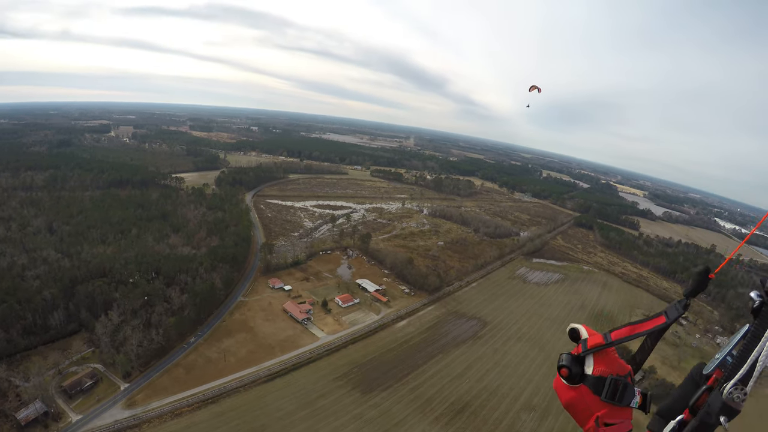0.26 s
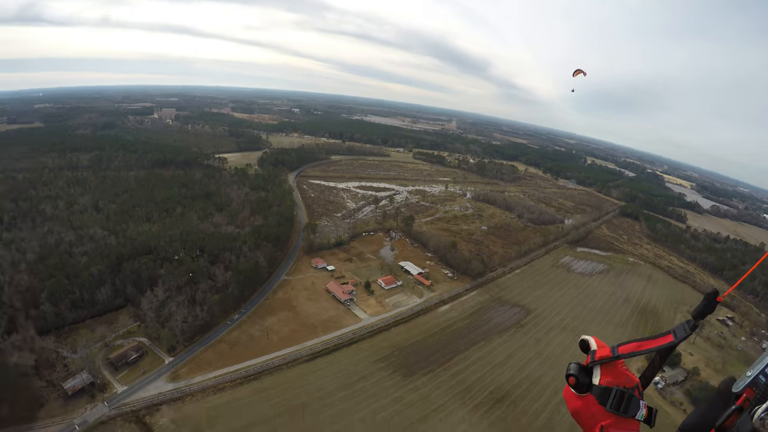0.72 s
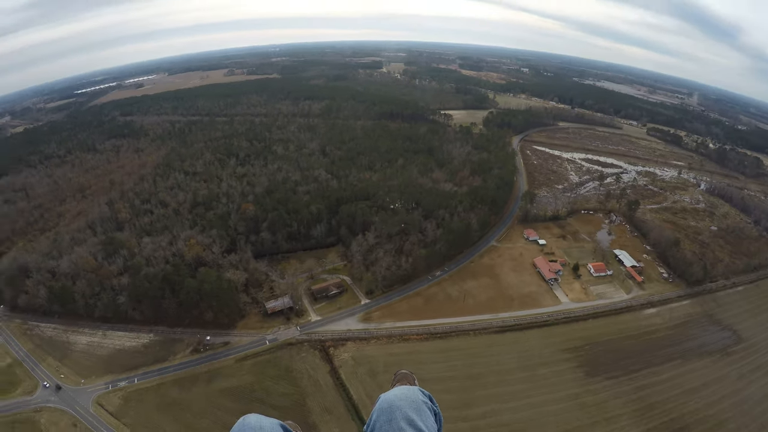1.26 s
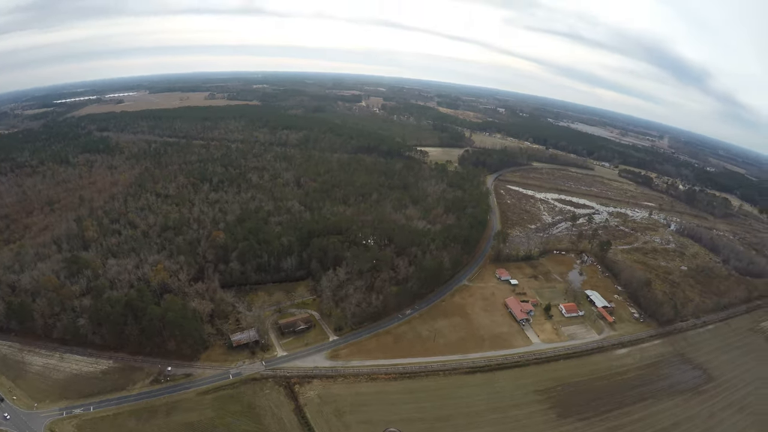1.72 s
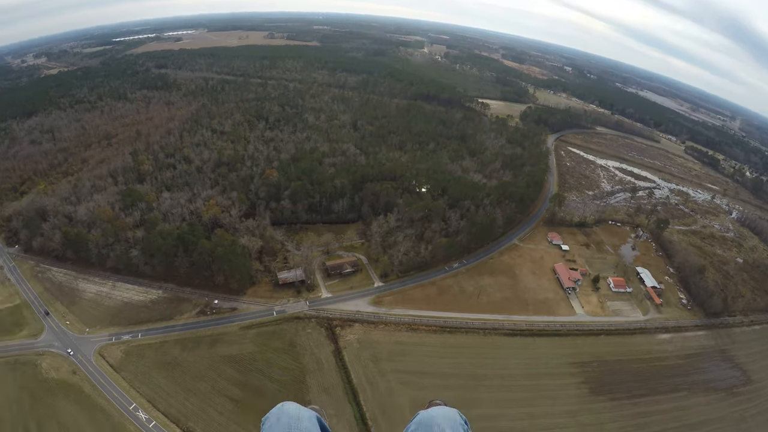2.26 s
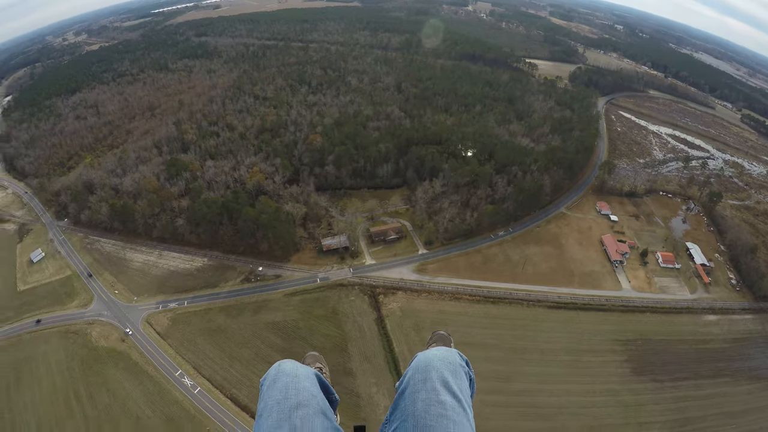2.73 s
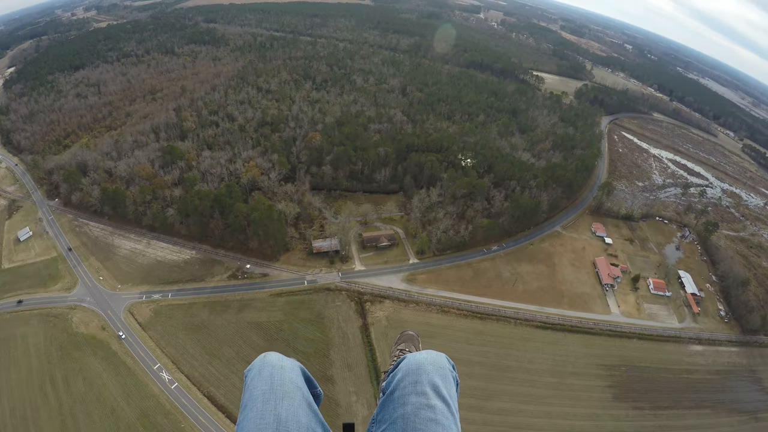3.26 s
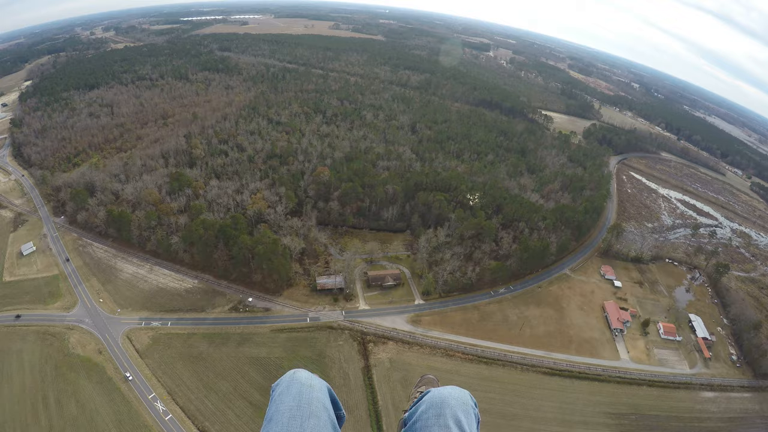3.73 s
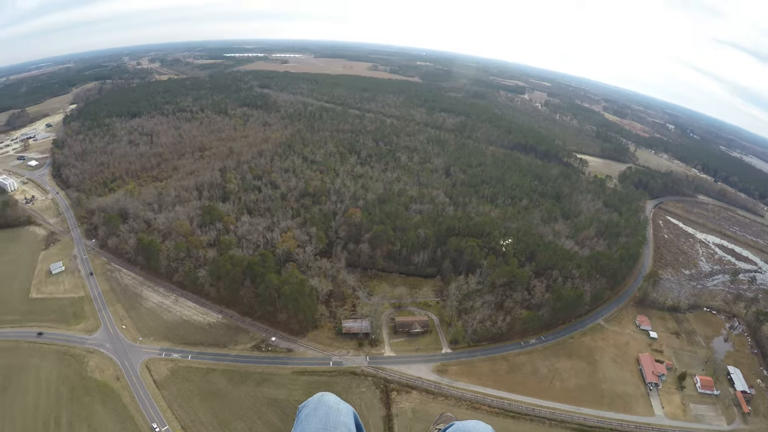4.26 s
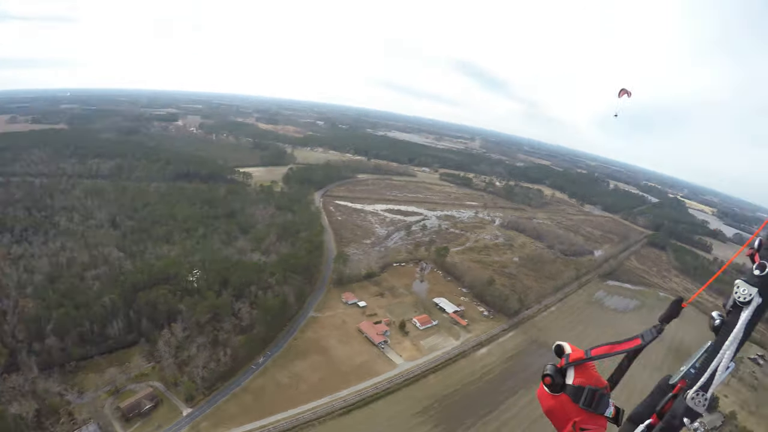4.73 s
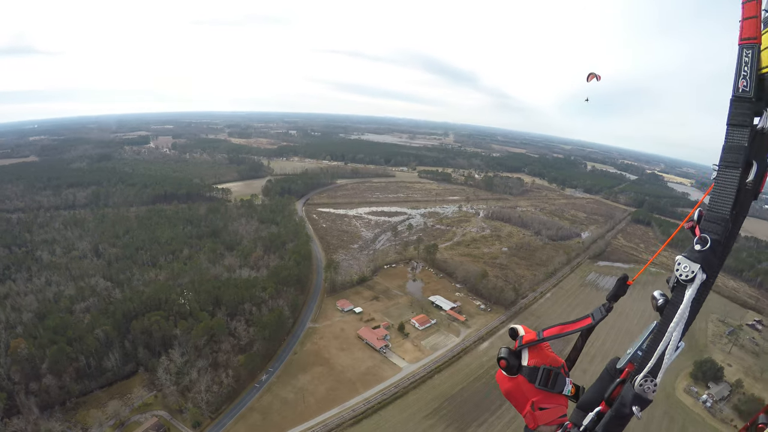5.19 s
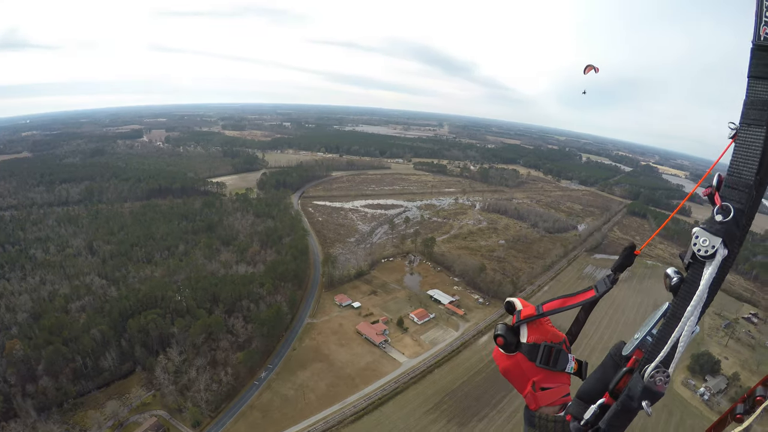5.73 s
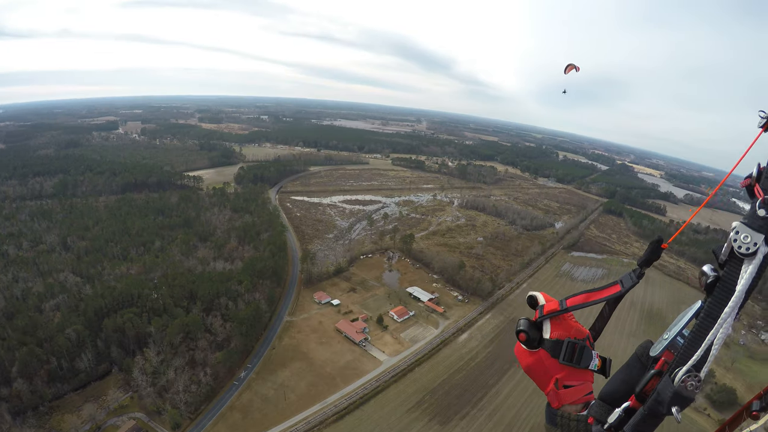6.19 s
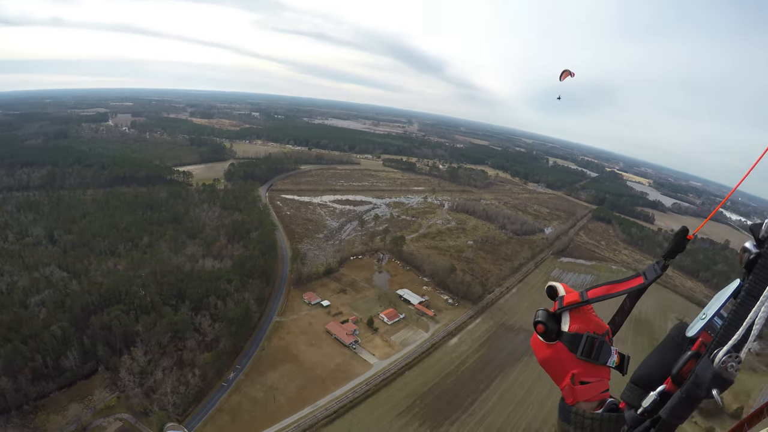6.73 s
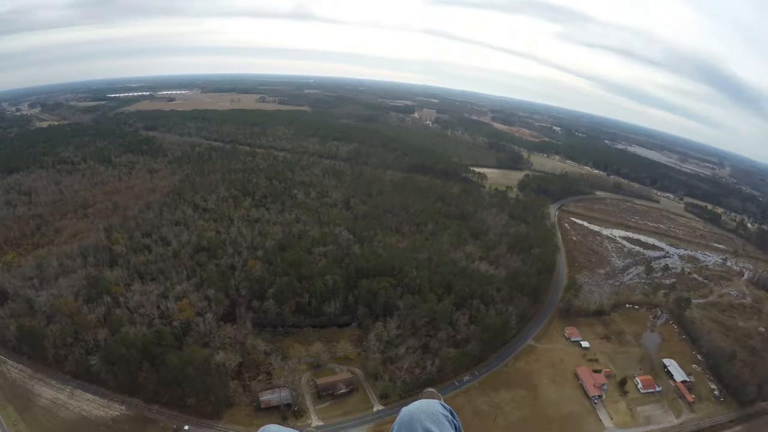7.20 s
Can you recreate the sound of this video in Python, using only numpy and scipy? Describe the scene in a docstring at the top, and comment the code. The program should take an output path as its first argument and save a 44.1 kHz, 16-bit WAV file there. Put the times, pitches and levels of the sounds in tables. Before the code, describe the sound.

A small two-stroke paramotor engine drones throughout, mixed with rushing air and heard through a thin, boxy headset microphone inside the pilot's helmet. For the first second the engine rattles over a low, fuzzy throb of wind. It then sounds fuller, its pitch rising slightly and easing back by 3 seconds. From about 1.5 to 2.5 seconds a gust rasps and gurgles, with small sharp slaps on the microphone and a hollow ringing. A second gust, brighter and more crackly, comes from about 4 to 4.6 seconds. From roughly 4.8 to 7.2 seconds the rattle and low throbbing return while the pitch creeps up, with a couple of small snaps near 6 seconds. A last ringing, slapping gust starts around 7.2 seconds. A faint electrical hiss and buzz lie underneath.

```python
"""Aloft, inside a pilot's helmet, a narrow-band headset microphone hears a two-stroke paramotor drone.
Each turn of the crank fires once, so the engine sounds a harmonic series and chops the rush of air.
Facing ahead the engine is fuller; facing aside the firings rattle and eddies throb at the helmet's rim.
Surges of airflow rasp, gurgle, slap the microphone and make the helmet's air space resonate.
A camera adds its own faint hiss and a buzz at its frame rate."""
import sys
import numpy as np
from scipy import signal
from scipy.fft import rfft, irfft
from scipy.io import wavfile
from scipy.ndimage import uniform_filter1d

SR = 44100
rng = np.random.default_rng(int(sys.argv[2]) if len(sys.argv) > 2 else 0)


def int16_out(signal):
    """Quantize to a 16-bit WAV file."""
    q = np.round(np.clip(np.atleast_2d(signal).T, -1, 1) * 32767)
    wavfile.write(sys.argv[1], SR, q.astype(np.int16))


N = 329030
T = np.arange(N) / SR
HZ = np.fft.rfftfreq(N, 1 / SR)
CONTROL_T = np.arange(0, T[-1] + 1, 1 / 24)  # the harmonics are updated 24 times a second
HEADSET_HZ = 3610  # upper band limit
GEAR_RATIO = 2.68  # crank turns per propeller turn
HALF_ASIDE = .65  # head position, from 0 (ahead) to 1 (aside)

# Crank speed. Each row: time in seconds, firing rate in Hz.
CRANK_SPEED = [(0.0, 71.45), (0.61, 71.76), (1.21, 73.97), (1.75, 75.01), (2.33, 73.82), (2.93, 71.99),
               (3.06, 72.09), (3.51, 71.01), (4.37, 71.08), (4.42, 70.79), (4.99, 71.18), (5.19, 72.28),
               (5.61, 73.72), (6.55, 75.93), (6.79, 75.57), (7.0, 76.2), (7.46, 75.97)]
# Airflow striking the helmet. Each row: peak time, rise and fall in seconds, strength,
# favoured frequency in Hz, its glide in Hz per second, amount of ringing.
AIR_SURGES = [(1.5, 0.19, 0.12, 0.26, 2120, 0, 0.04), (1.52, 0.13, 0.19, .2, 3370, 0, 0),
              (1.96, 0.28, 0.46, 0.94, 1900, -600, 1.1), (4.21, 0.26, 0.3, 0.84, 2960, 4, 0.32),
              (5.55, 0.18, 0.19, 0.11, 2650, 9, 0), (5.87, 0.035, 0.052, 0.335, 2350, -12, 0.5),
              (6.92, 0.046, 0.037, 0.44, 2380, -18, 0.25), (7.38, 0.07, 0.36, 0.87, 1136, -13, 1.1)]


def engine(turns, aside, surge, fade_db=2.25, shake_db=1.3, shake_rad=0.14, smear_rad=.5, count=49):
    """Periodic pulses make a harmonic series: each firing is a bright crack and a dull, falling chuff."""
    # Each row: harmonic number, then base level in dB facing ahead, half aside and aside.
    harmonics = [(1, -79, -73, -72), (2, -94, -89, -81), (3, -83, -74, -66), (4, -69, -71, -74),
                 (5, -63.5, -76, -77), (6, -62.5, -69.5, -74), (7, -61.5, -66.5, -69), (8, -63, -71, -69.5),
                 (9, -68, -69.5, -70), (10, -70, -64.5, -71), (11, -60, -66, -78), (12, -63, -64.5, -70),
                 (13, -75, -67, -70), (14, -67.5, -68, -69), (15, -62, -73.5, -72), (16, -69, -78, -82),
                 (17, -71, -70, -72), (18, -72.5, -76, -74), (19, -70.5, -69.5, -73), (20, -69, -75, -72),
                 (21, -68.5, -68, -74.5), (22, -77, -67, -68.5), (23, -74.5, -75, -72),
                 (24, -73, -72.5, -72.5)]
    # Gains of the low and upper harmonics, and the level from which the top ones fall away.
    # Each holds: dB facing ahead, dB facing aside, dB added by a full surge.
    low_gains = (0.2, -4, 0)
    upper_gains = (1.5, -2.5, 7)
    top_levels = (-78, -74.5, 10.5)
    aside, surge = np.interp(CONTROL_T, T, aside), np.interp(CONTROL_T, T, surge)
    low_db, upper_db, top_db = (exposure(x, aside, surge) for x in (low_gains, upper_gains, top_levels))
    multiples = np.arange(1, count + 1)
    out, phasor, firing = np.zeros(N), 1, np.exp(2j * np.pi * turns)
    for k, crack in zip(multiples, exhaust_cracks(aside, multiples)):
        if k <= len(harmonics):
            upper = np.clip((k - 12) / 12, 0, 1)
            db = np.interp(aside, [0, HALF_ASIDE, 1], harmonics[k - 1][1:])
            db += (1 - upper) * low_db + upper * upper_db
            if k <= 11:
                phase = -smear_rad * k ** 2  # the silencer smears the low harmonics
            else:
                chuff = np.exp(-2j * np.pi * (.04 * k + 7.5 * np.log(k)))  # lower ones arrive later
                dull = 1 / (1 + (k / 21) ** 6)
                phase = np.angle(dull * chuff + (1 - dull) * crack)
            amplitude = gain_of(db + fade_db * drift(3)) * np.exp(1j * phase)
        else:
            amplitude = gain_of(top_db - .42 * (k - len(harmonics))) * crack / np.sqrt(abs(crack) + 1e-9)
        level_shake, phase_shake = rng.standard_normal((2, len(CONTROL_T)))  # the air shakes each one
        amplitude *= gain_of(shake_db * level_shake) * np.exp(1j * shake_rad * phase_shake)
        phasor = phasor * firing
        out += np.sqrt(2) * (np.interp(T, CONTROL_T, amplitude) * phasor).real
    return out


def exhaust_cracks(aside, multiples, slide_turns=0.034, sway_turns=.004, count=12):
    """Multipath interference: a crack arrives by many paths, which shift as the head turns."""
    # Direct paths. Each row: delay in turns facing ahead and aside, relative dB ahead and aside.
    direct_paths = [(.02, -.03, -16, 0), (.44, .37, -6, -6)]
    # Scattering off frame and pilot: relative dB facing ahead, then aside.
    scatter_gains = (-1, -12)

    def path(late, db):
        return gain_of(db) * np.exp(-2j * np.pi * np.outer(multiples, late + sway_turns * drift(2)))

    turned = np.clip(aside / HALF_ASIDE, 0, 1)
    out = sum(path(late + aside * (late_aside - late), db + turned * (db_aside - db))
              for late, late_aside, db, db_aside in direct_paths)
    scatter_db = np.interp(turned, [0, 1], scatter_gains)
    for n, (place, sign, lean) in enumerate(rng.uniform(-1, 1, (count, 3))):
        late_turns = .62 + .3 * (n + place / 2) / count + slide_turns * lean * aside
        out += np.sign(sign) * path(late_turns, scatter_db) / np.sqrt(count)
    return out


def crank(jitter_hz=.06):
    """Phase is the integral of frequency: crank turns, their speed shaken by uneven firings."""
    return np.cumsum(curve(CRANK_SPEED) + jitter_hz * wander(22.8)) / SR


def rasp(turns, aside, level_db, trim_db=-2, grain_db=5.7, calm_db=-60):
    """Turbulence makes grainy noise, chopped by the firings; the louder, the patchier."""
    # Each row: frequency in Hz, relative level in dB.
    spectrum = [(100, -59), (500, -8.5), (900, -8.5), (1300, 0), (1700, -10.5), (2200, 0), (2900, 3.5),
                (3600, 2.5), (4600, -62)]
    patch_db = np.clip(0.16 * (level_db - calm_db), 1, 6)
    grains = speckle(rng.standard_normal(N), patch_db)
    grains *= gain_of(grain_db * np.tanh(wander(610)))
    return gain_of(level_db + trim_db) * coloured(grains * puffs(turns, aside), spectrum)


def puffs(turns, aside, uneven=0.43, floor=.2):
    """Pulse modulation: puffs of hiss follow the cracks and decay exponentially, no two alike."""
    # Each row: delay and decay time in turns, relative strength facing ahead and aside.
    pulses = [(0, .08, .08, 1), (.39, .08, .35, .5), (.68, .2, .8, .12)]
    turned, envelope = np.clip(aside / HALF_ASIDE, 0, 1), floor
    for late, decay, ahead, side in pulses:
        chance = rng.uniform(-1, 1, size=1000)[(turns - late + 1).astype(int)]
        strength = (ahead + turned * (side - ahead)) * (1 + uneven * chance)
        envelope = envelope + strength * np.exp(-((turns - late) % 1) / decay)
    return unit_rms(envelope)


def speckle(x, depth_db, size=512):
    """Intermittency: turbulence lifts patches a few hundred Hz wide and tens of milliseconds long."""
    spectra = signal.stft(x, nperseg=size)[2]
    patches = uniform_filter1d(rng.standard_normal(spectra.shape), size=4, axis=0)
    patches = unit_rms(uniform_filter1d(patches, size=5, axis=1))
    depth_db = np.interp(np.linspace(0, T[-1], spectra.shape[1]), T, depth_db)
    lift = gain_of(depth_db * np.clip(patches, -2, 2))
    lift /= np.sqrt(np.mean(lift ** 2, axis=0))
    return unit_rms(signal.istft(spectra * lift, nperseg=size)[1][:N])


def wash(turns, aside, level_db, trim_db=-2.5, flutter_db=1):
    """Amplitude modulation: the propeller's dull rush throbs with each chuff, more deeply aside."""
    # Each row: frequency in Hz, relative level in dB.
    spectrum = [(20, -12), (45, -14.5), (90, -11), (200, -8), (350, -14), (550, -4.5), (800, -6.5),
                (1100, -5.5), (1600, -4), (3400, -8), (5000, -37)]
    throb = (.25 + .4 * aside) * np.cos(2 * np.pi * (turns - .5))
    air = rng.standard_normal(N) * (1 + throb) * gain_of(flutter_db * wander(25))
    return gain_of(level_db + trim_db) * coloured(air, spectrum)


def surging():
    """Surges superpose into the airstream's force on the helmet: 0 is calm, 1 a full surge."""
    return sum(strength * swell(peak, rise, fall) for peak, rise, fall, strength, *_ in AIR_SURGES)


def helmet(tones, noise, aside, gap_width_hz=170, surge_width_hz=260, calm_ringing=0.071):
    """Resonance: head angle and surges each favour a band, and the helmet's air space rings."""
    # Band of the gap between helmet and shoulder. Each row: time in seconds, centre in Hz.
    gap_band = [(.8, 712), (1.2, 930), (4.8, 820), (5.3, 1094), (6.2, 1110), (6.6, 875), (7.2, 770)]
    # Modes of the air space. Each row: frequency in Hz, bandwidth in Hz, relative gain in dB.
    cavity_modes = [(797, 38, -11.5), (979, 4.9, 22), (1128.5, 28, 8.5)]
    favoured = 0.88 * aside * resonate(tones + 0.064 * noise, curve(gap_band), gap_width_hz)
    ringing = calm_ringing
    for peak, rise, fall, _, hz, glide, rings in AIR_SURGES:
        band = resonate(tones + noise, hz + glide * (T - peak), surge_width_hz)
        favoured += 0.7 * swell(peak, rise, fall) * band
        ringing += rings * swell(peak + .3 * rise, rise, fall) ** 1.5  # fullest just after the crest
    response = sum(gain_of(db) / (1 + 2j * (HZ - hz) / width) for hz, width, db in cavity_modes)
    ring = ringing * irfft(rfft(tones + 0.86 * noise) * response, N)
    return tones + noise + favoured + ring


def shoulder_echo(x, aside, surge, calm_echo=0.044, surge_echo=0.14):
    """Comb filtering: facing ahead, an echo off the shoulder slides in delay as the head moves."""
    # Each row: time in seconds, comb spacing in Hz.
    comb_spacing = [(1.4, 1140), (1.9, 950), (2.45, 795), (4.2, 738), (4.7, 710), (7.3, 1140)]
    strength = (1 - aside) * (calm_echo + surge_echo * np.sqrt(surge))
    echo = np.interp(T - 1 / curve(comb_spacing), T, x)
    return (x + strength * echo) / np.sqrt(1 + strength ** 2)


def buffet(surge, trim_db=-1, widths_hz=(52, 190), rumble_db=-73, flutter_db=0.9, edge_s=0.033):
    """Vortex shedding at the helmet's rim: a loose rumble locks into a low fuzzy note as it grows."""
    # Two spells of throbbing, one list each. Each row: time in seconds, level in dB before trim.
    spells = [
        [(0.0, -55), (0.034, -57.5), (0.35, -61.5), (0.604, -57.5), (0.794, -51.5), (0.91, -58), (0.97, -74),
         (1.07, -59), (1.12, -78)],
        [(4.72, -70), (4.89, -52.5), (5.01, -56), (5.07, -47.5), (5.18, -51.5), (5.3, -53.5), (5.69, -49.5),
         (5.91, -55), (5.97, -51), (6.11, -55), (6.35, -57), (6.42, -57), (7.16, -59.5), (7.27, -81),
         (7.3, -64)],
    ]
    # Each row: time in seconds, pitch of the eddies in Hz.
    eddy_pitch = [(.5, 117), (.8, 153.6), (5.1, 159.3), (6.2, 139.5), (6.5, 177), (7, 150)]
    # Each row: frequency in Hz, relative level in dB.
    rumble_spectrum = [(20, 0), (40, -30), (70, -0.5), (120, 2.5), (200, 3), (350, -2), (800, -29)]
    # Levels in dB at which locking begins and is complete.
    locking_range = (-62, -55)
    hz, level = curve(eddy_pitch), gain_of(-87.5 + 16.5 * surge)
    for spell in spells:
        outside_s = abs(T - np.clip(T, spell[0][0], spell[-1][0]))
        level = np.maximum(level, gain_of(curve(spell)) * np.exp(-outside_s / edge_s))
    level_db = 20 * np.log10(level) + flutter_db * wander(7)
    high_pass = signal.butter(2, 75, "high", fs=SR, output="sos")
    bands = (resonate(resonate(rng.standard_normal(N), hz, width), hz, width) for width in widths_hz)
    narrow, loose = (unit_rms(signal.sosfilt(high_pass, band)) for band in bands)
    steady = unit_rms(narrow / np.sqrt(uniform_filter1d(narrow ** 2, size=2500) + 1e-9))
    locked = np.interp(level_db, locking_range, [0, 1])
    note = gain_of(level_db + trim_db) * (locked * steady + np.sqrt(1 - locked ** 2) * loose)
    rumble = coloured(rng.standard_normal(N), rumble_spectrum)
    return note + gain_of(rumble_db + 0.81 * (level_db - level_db.mean())) * rumble


def slaps(knock_s=0.002, crack_s=0.0013, crack_octaves=0.34, size=1024):
    """Impulsive excitation: a gust hits the microphone with a pitched knock and a crack of noise."""
    # Each row: start in seconds, knock pitch in Hz and level in dB, crack centre in Hz and peak in dB.
    gusts = [(1.064, 1310, -50, 2000, -42), (1.602, 2060, -35.5, 1900, -38), (1.885, 975, -39, 1850, -37),
             (1.991, 1137, -40, 2500, -35), (2.099, 1093, -40, 1496, -44), (2.369, 1590, -42, 1900, -48),
             (2.396, 1125, -44, 1520, -35.5), (2.464, 1620, -41, 2100, -42), (4.025, 660, -42, 1242, -36.5),
             (4.051, 2380, -40, 2710, -33), (4.138, 1650, -36, 2300, -31.5), (4.166, 1470, -44, 2700, -35),
             (4.178, 654, -37.5, 1490, -32), (4.207, 1380, -45, 2500, -33), (4.22, 3080, -34, 2700, -38),
             (4.335, 1150, -41, 1524, -34.5), (4.361, 1600, -48, 2800, -32.5), (4.446, 856, -44, 1700, -39),
             (4.558, 775, -44, 1387, -43), (7.225, 762, -38.5, 1500, -42), (7.238, 775, -44, 1470, -48),
             (7.278, 760, -46, 1400, -50), (7.316, 600, -43, 2450, -39), (7.331, 790, -48, 1500, -47),
             (7.433, 1156, -50, 2200, -38), (7.448, 1130, -45, 1610, -34)]
    out, t, hz = np.zeros(N), np.arange(size) / SR, np.fft.rfftfreq(size, 1 / SR)
    for start, knock_hz, knock_db, crack_hz, crack_db in gusts:
        band = np.exp(-(np.log2((hz + 1) / crack_hz) / crack_octaves) ** 2 / 2) * (hz < HEADSET_HZ)
        crack = irfft(rfft(rng.standard_normal(size)) * band) * t * np.exp(-t / crack_s)
        crack /= abs(crack).max()
        add(out, start, gain_of(knock_db) * knock(knock_hz, knock_s) + gain_of(crack_db) * crack)
    return out


def gurgle(turns, surge, db=-46.0, spread_db=3, pitch_scatter=0.041, rise_s=0.00227):
    """In a surge the firings knock pockets of air loose, each a damped oscillation at its own pitch."""
    # Each row: mean pitch in Hz, relative level in dB.
    pockets = [(1300, -6), (1650, -7.5), (1950, 0), (2350, -1), (2900, 0), (3300, 3)]
    out, firings = np.zeros(N), np.flatnonzero(np.diff(np.floor(turns)))
    for hz, pocket_db in pockets:
        timings, shapes = rng.random((len(firings), 2)), rng.standard_normal((len(firings), 2))
        for at, (chance, late), (size, detune) in zip(firings, timings, shapes):
            if chance < .4 * surge[at] ** 2:
                level = gain_of(db + pocket_db + spread_db * min(size, 1)) * np.sqrt(surge[at])
                add(out, T[at] + late * rise_s, level * knock(hz * (1 + pitch_scatter * detune), rise_s))
    return out


def ticks(hz=2900, rise_s=0.00085):
    """Heavily damped oscillations are heard as bright snaps in the rattle."""
    # Each row: start in seconds, peak level in dB.
    snaps = [(5.903, -39), (6.118, -39)]
    out = np.zeros(N)
    for start, db in snaps:
        add(out, start, gain_of(db) * knock(hz, rise_s))
    return out


def propeller(turns, db=-75, peak_hz=800, octaves=1.47, fade_db=2, count=28):
    """Two geared-down blades chop the air, making faint harmonics of the blade-passing frequency."""
    passes, blade_hz = 2 * turns / GEAR_RATIO, 2 * curve(CRANK_SPEED).mean() / GEAR_RATIO
    multiples = np.arange(1, count + 1)
    amplitudes = np.exp(-(np.log2(multiples * blade_hz / peak_hz) / octaves) ** 2 / 2)
    chop = sum(amplitude * np.cos(2 * np.pi * (k * passes + phase))
               for k, amplitude, phase in zip(multiples, amplitudes, rng.random(count)))
    return gain_of(db + fade_db * wander(2)) * chop


def camera(frame_hz=59.94, hiss_db=-70.5, tick_db=-80, whine_db=-76, right_buzz_db=2.5):
    """Electrical noise: amplifier hiss, and ticks and whining bursts that buzz at the frame rate."""
    # Each row: time within the frame and length in seconds, relative whine and tick levels in dB.
    bursts = [(.0015, 0.00019, -16, -9), (.0021, 0.00049, 11, -23), (.0028, 0.00058, 5.5, 8),
              (.0054, 0.00081, -33, -30), (0.0141, .0006, -16, 4), (0.016, 0.00063, 3, 4.5)]
    # Three spectra. Each row: frequency in Hz, relative level in dB.
    tick_spectrum = [(3000, -47), (4500, -0.5), (10000, 2), (12000, 2.5), (12600, 13), (15300, -4)]
    whine_spectrum = [(11000, -24), (12400, -18.5), (14200, -15), (14700, 0), (15000, -2), (15300, -8),
                      (15450, -36)]
    hiss_spectrum = [(3000, -1.5), (5000, 3.5), (11500, 4), (13000, 4), (15300, 3)]
    t = np.arange(round(SR / frame_hz)) / SR
    starts = np.arange(0, T[-1], 1 / frame_hz)[:, None] * SR
    near = starts.astype(int) + np.arange(-24, 25)
    clock = np.zeros(N)
    clock[near % N] = np.sinc(near - starts) * np.hanning(near.shape[1])  # one impulse a frame
    clicks = sum(gain_of(db) * np.roll(clock, round(s * SR)) for s, _, _, db in bursts)
    gate = 0.37 + sum(gain_of(db) * np.exp(-(2 * (t - s) / length) ** 2) for s, length, db, _ in bursts)
    repeating = signal.oaconvolve(clock, gate * rng.standard_normal(len(t)))[:N]
    unsteady = 0.77 * signal.oaconvolve(clock, gate)[:N] * rng.standard_normal(N)
    buzz = gain_of(tick_db) * coloured(clicks, tick_spectrum)
    buzz += gain_of(whine_db) * coloured(repeating + unsteady, whine_spectrum)
    hiss = np.array([coloured(rng.standard_normal(N), hiss_spectrum) for _ in range(2)])
    return gain_of(hiss_db) * hiss + np.array([buzz, buzz * gain_of(right_buzz_db)])


def exposure(levels, aside, surge):
    """A layer's dB for this head position and airstream."""
    ahead_db, aside_db, surge_db = levels
    return ahead_db + aside * (aside_db - ahead_db) + surge_db * surge


def resonate(x, hz, width_hz):
    """A resonance of gain 1 that follows the curve hz."""
    phasor, pole = np.exp(2j * np.pi * np.cumsum(hz) / SR), np.exp(-np.pi * width_hz / SR)
    return 2 * (phasor * signal.lfilter([1 - pole], [1, -pole], x / phasor)).real


def knock(hz, rise_s, size=1024):
    """A damped oscillation that swells to 1 and dies in a few cycles."""
    t = np.arange(size) / SR
    return t / rise_s * np.exp(1 - t / rise_s) * np.sin(2 * np.pi * (hz * t + rng.random()))


def swell(peak, rise, fall, flatness=2.5):
    """A bell curve from 0 to 1 and back."""
    return np.exp(-abs((T - peak) / np.where(T < peak, rise, fall)) ** flatness)


def wander(rate_hz):
    """Low-pass noise of rms 1."""
    return unit_rms(irfft(rfft(rng.standard_normal(N)) / (1 + (HZ / rate_hz) ** 4), N))


def drift(rate_hz):
    """Slow random variation at the control rate."""
    knots = np.arange(0, CONTROL_T[-1] + 1, 1 / rate_hz)
    return np.interp(CONTROL_T, knots, rng.standard_normal(len(knots)))


def coloured(x, points):
    """Filters x by a curve of (Hz, dB) points, to rms 1."""
    hz, db = np.transpose(points)
    return unit_rms(irfft(rfft(x) * gain_of(np.interp(np.log(HZ + 1), np.log(hz), db)), N))


def low_pass(x, hz, taps):
    """Steep linear-phase low-pass along the last axis."""
    kernel = signal.firwin(taps, hz, window=("kaiser", 8), fs=SR)
    return signal.oaconvolve(np.atleast_2d(x), kernel[None], "same")


def gain_of(db):
    """Decibels to amplitude."""
    return 10 ** (np.asarray(db) / 20)


def unit_rms(x):
    """Scales to rms 1."""
    return x / np.sqrt(np.mean(x ** 2) + 1e-20)


def curve(rows):
    """Joins (seconds, value) rows by straight lines."""
    return np.interp(T, *np.transpose(rows))


def add(mix, start_s, sound):
    """Mixes a sound in at start_s."""
    part = mix[round(start_s * SR):][:len(sound)]
    part += sound[:len(part)]


def scene(propeller_throb=0.12, gust_db=0.67, left_lag_s=5.7 / SR):
    """Engine and air superpose at one narrow-band microphone, which feeds both channels."""
    # Each row: time in seconds, head position from 0 (ahead) to 1 (aside).
    head_position = [(0, 0.72), (.9, 0.89), (1.2, 0.45), (1.65, 0.053), (3.3, 0.083), (4.5, 0),
                     (4.75, 0.29), (5.05, 0.94), (5.35, 1), (6, 0.75), (6.65, 0.7), (7.1, 0.64),
                     (7.3, 0.17), (7.46, 0.041)]
    # Levels before trim. Each holds: dB facing ahead, dB facing aside, dB added by a full surge.
    wash_levels = (-49.5, -59, -0.5)
    rasp_levels = (-57, -58.5, 7.5)
    turns, aside, surge = crank(), np.clip(curve(head_position), 0, 1), surging()
    wash_db = exposure(wash_levels, aside, surge)
    rasp_db = exposure(rasp_levels, aside, surge) + gust_db * wander(8)
    swirl = 1 + propeller_throb * np.cos(2 * np.pi * turns / GEAR_RATIO)  # once a propeller turn
    rush = swirl * (rasp(turns, aside, rasp_db) + wash(turns, aside, wash_db))
    tones = engine(turns, aside, surge) + propeller(turns)
    air = helmet(tones, shoulder_echo(rush, aside, surge), aside) + buffet(surge)
    air += gurgle(turns, surge) + slaps() + ticks()
    right = low_pass(air, HEADSET_HZ, taps=451)[0]
    left = irfft(rfft(right) * np.exp(-2j * np.pi * HZ * left_lag_s), N)
    return np.array([left, right])


def record(dry):
    """The camera adds its own noise, then its band limit."""
    return low_pass(dry + camera(), hz=15330, taps=1501)


dry = scene()
out = record(dry)
int16_out(out)
```